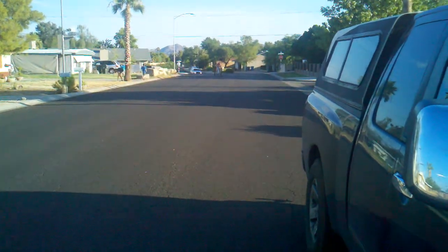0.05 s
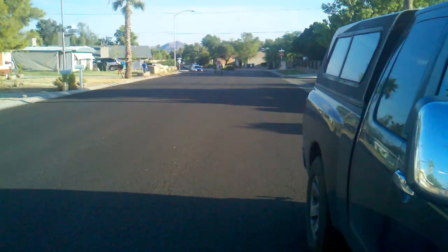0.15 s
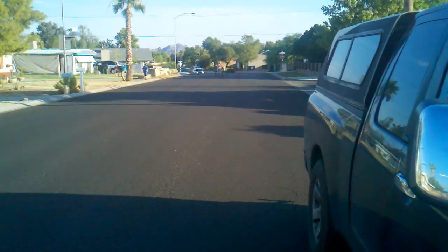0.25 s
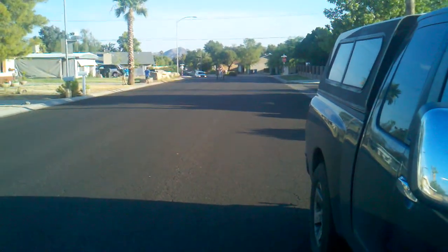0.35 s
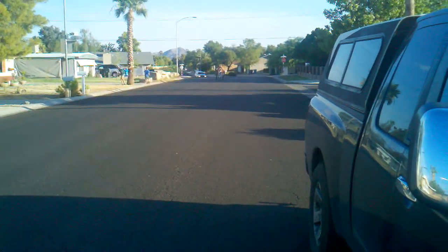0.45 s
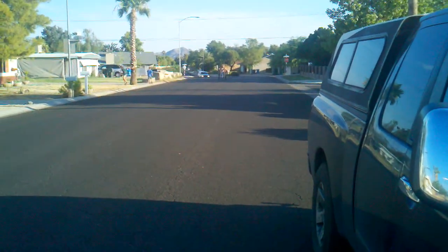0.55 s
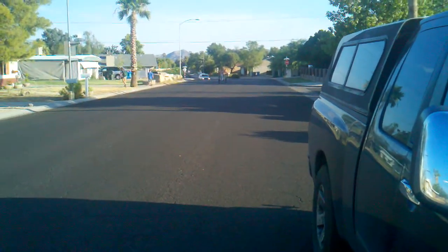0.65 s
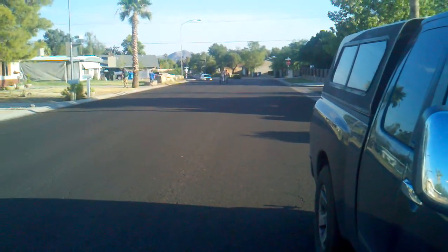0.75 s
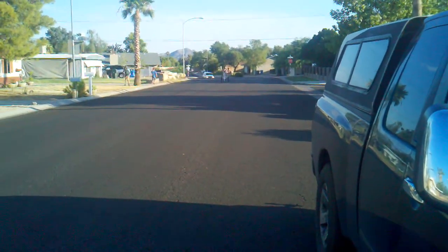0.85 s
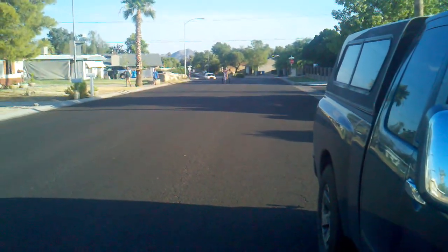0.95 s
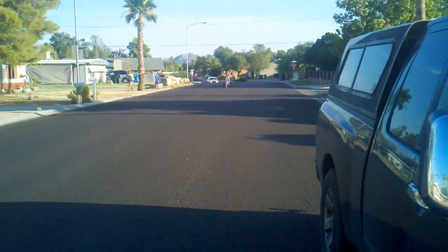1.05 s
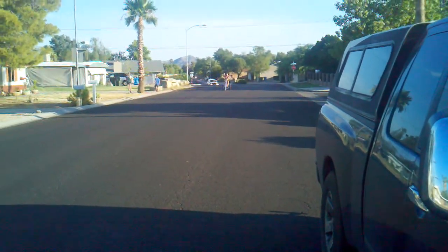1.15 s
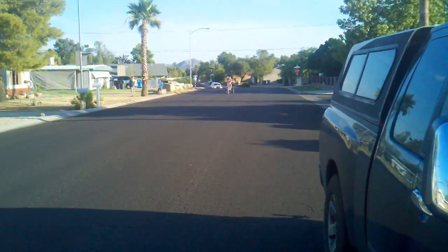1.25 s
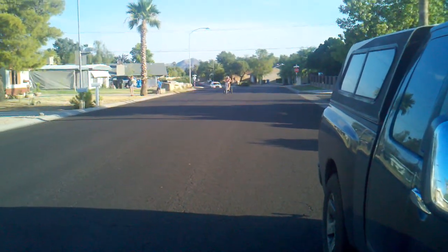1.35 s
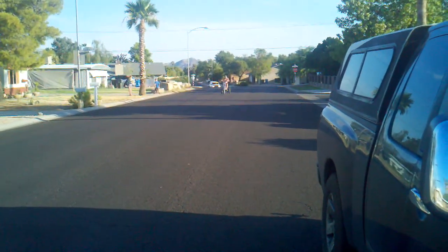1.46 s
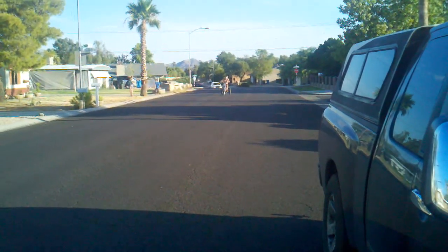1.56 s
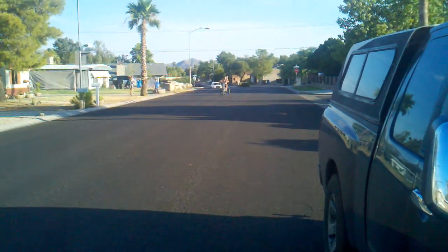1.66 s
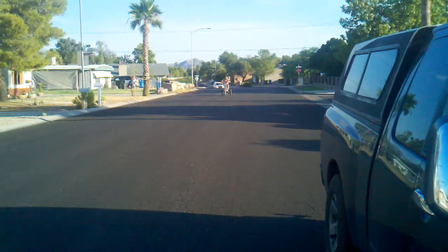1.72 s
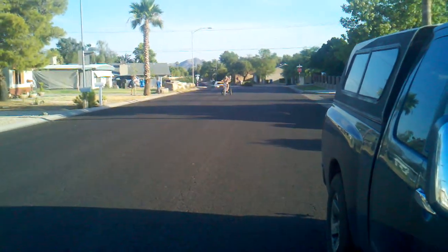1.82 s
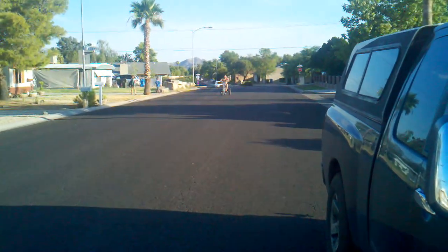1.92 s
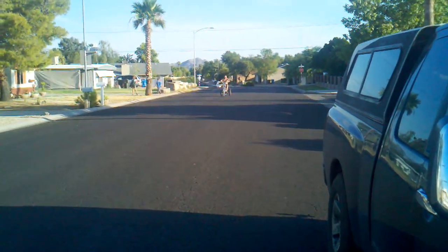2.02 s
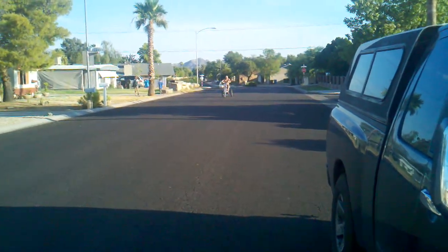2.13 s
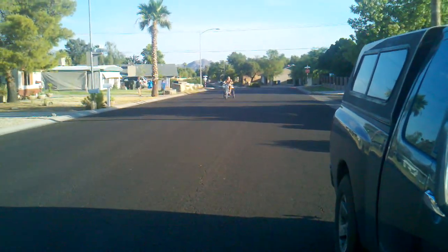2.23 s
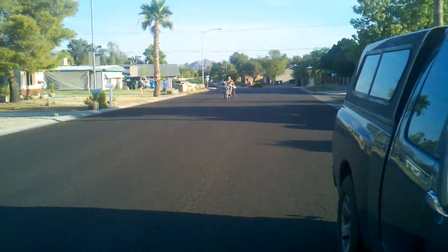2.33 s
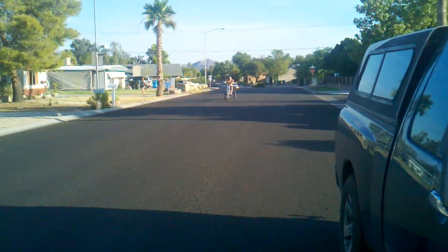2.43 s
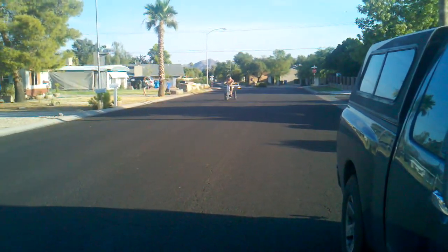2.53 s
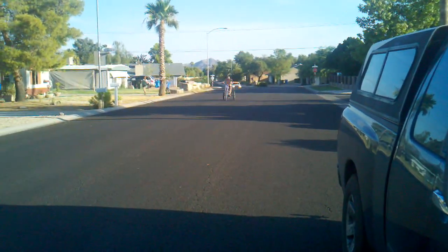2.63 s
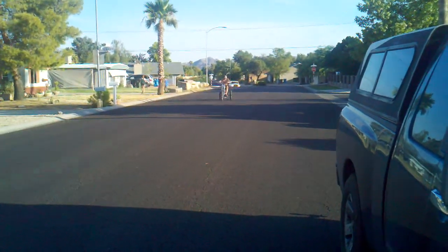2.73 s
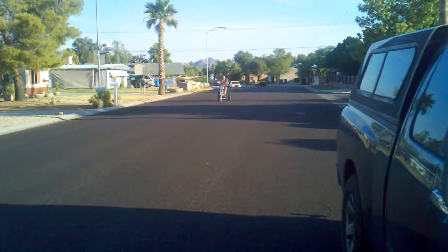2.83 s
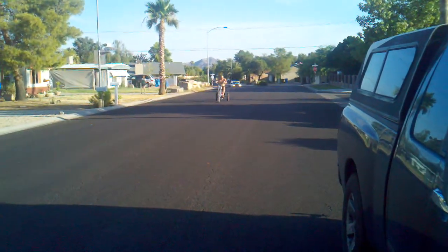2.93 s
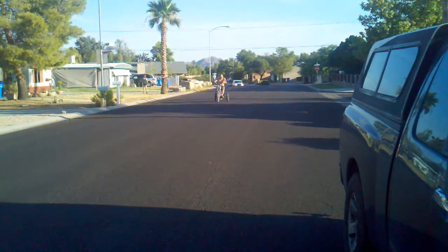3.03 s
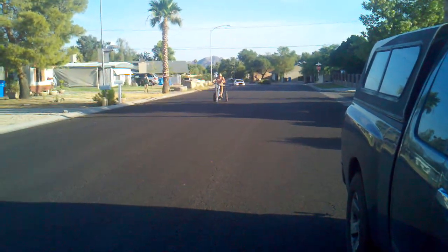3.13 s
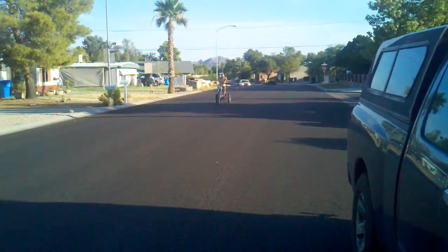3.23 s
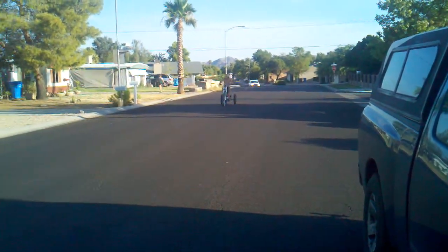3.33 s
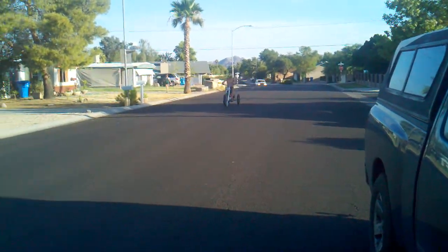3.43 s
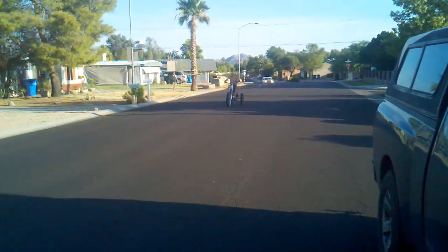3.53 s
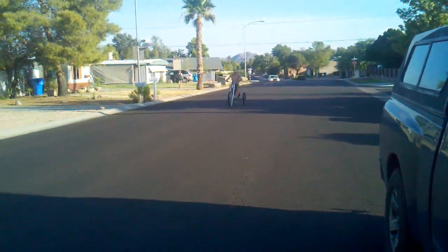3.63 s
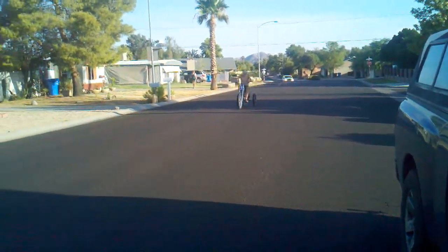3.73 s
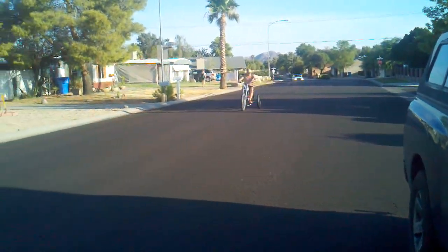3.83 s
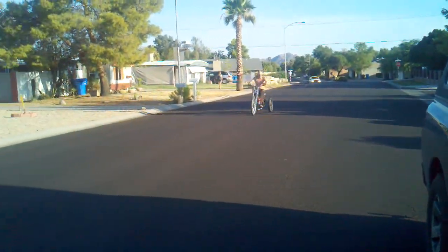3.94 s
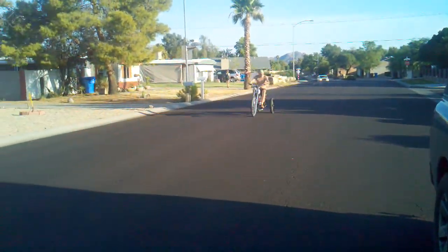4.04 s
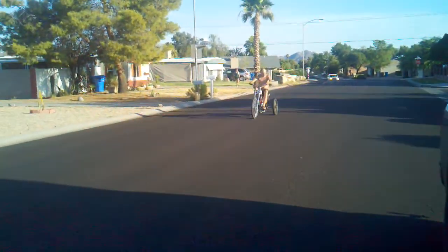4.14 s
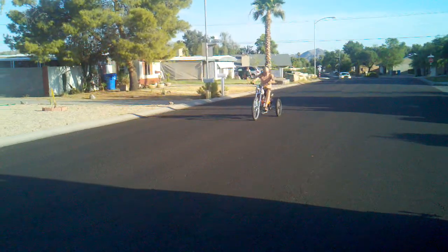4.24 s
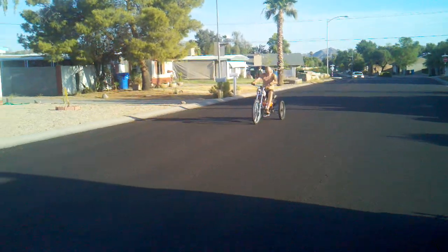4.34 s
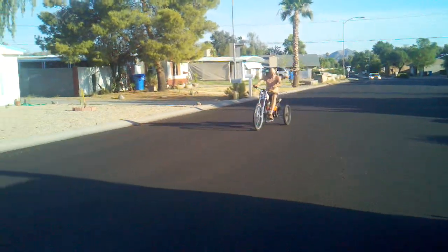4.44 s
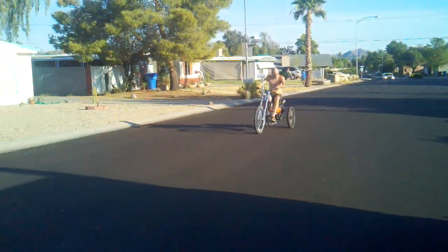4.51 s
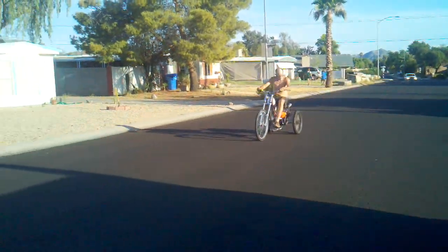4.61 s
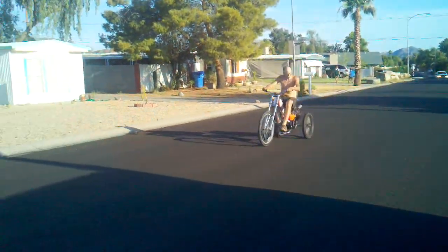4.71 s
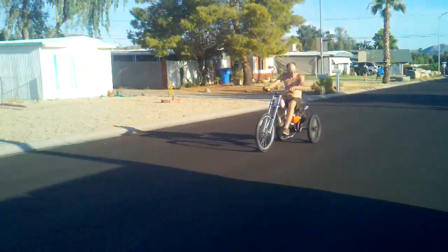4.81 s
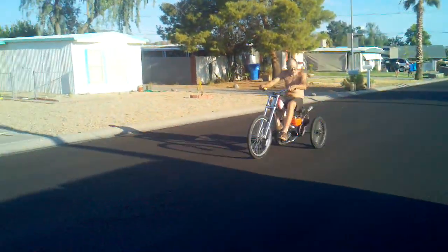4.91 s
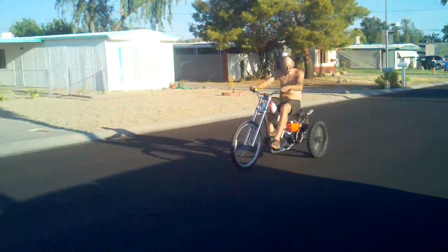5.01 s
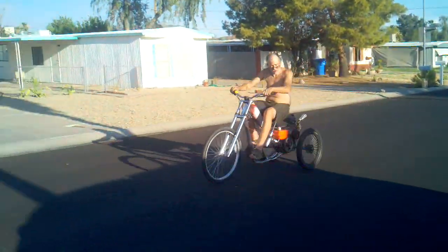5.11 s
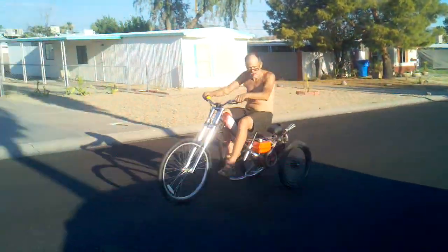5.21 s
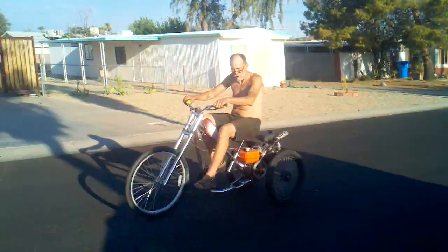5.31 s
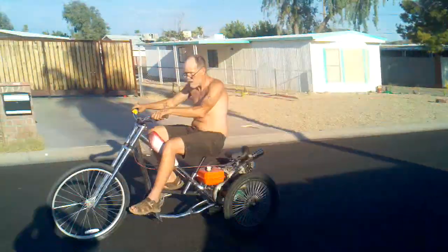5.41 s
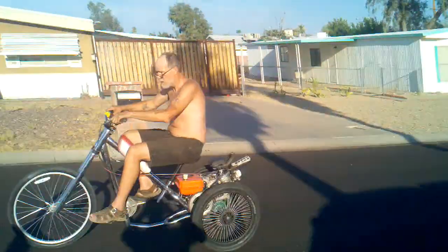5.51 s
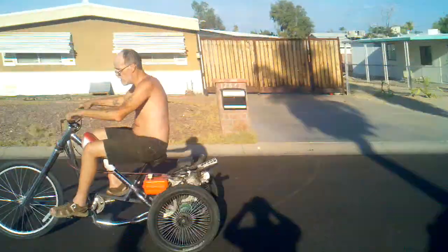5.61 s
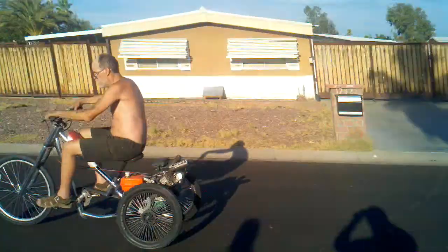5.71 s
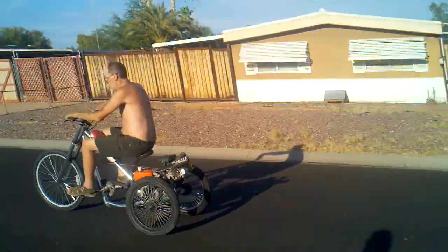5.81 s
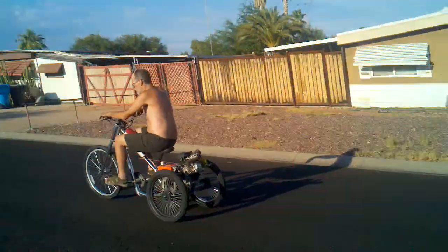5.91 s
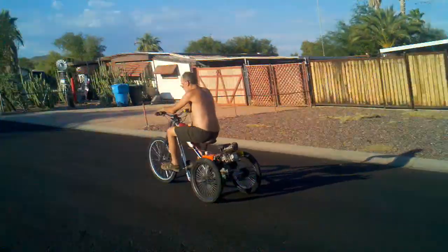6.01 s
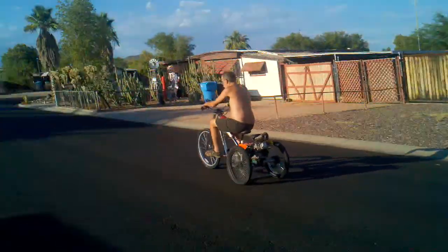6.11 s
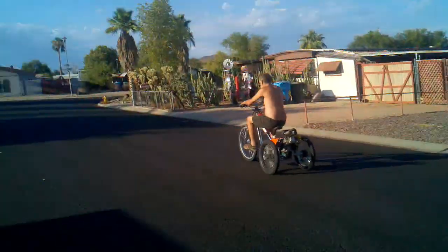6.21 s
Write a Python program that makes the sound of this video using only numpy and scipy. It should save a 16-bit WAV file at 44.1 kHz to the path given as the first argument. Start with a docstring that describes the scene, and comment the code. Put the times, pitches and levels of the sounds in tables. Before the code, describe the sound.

Outdoors on a quiet residential street, a small single-cylinder four-stroke tricycle is first heard far off: low, hollow, uneven putts, about twenty per second, with odd missed beats near 0.3, 0.8 and 1.5 s. Behind it lie a faint low traffic murmur and tiny high bird chirps at 0.6, 1.1 and 1.7 s. Soft wind buffets come from about 1.3 s, strongest near 2.8 s. The firing quickens to around thirty-five per second and swells steadily, gaining metallic casing rattle, valve clatter and chain hiss, with short street echoes. From 5 s it rushes close, hollow tone sinking, and passes about 5.6 s with a loud, rough bark. The throttle shuts at 5.7 s; pitch falls and dry pops crack, ending in a heavy thump near 6.1 s. The engine picks up again, moving away until the 6.3 s end. Wide stereo, with loud beats compressed.

```python
"""Motor tricycle passing on a street

A tricycle with a small single-cylinder four-stroke engine speeds up along a residential street and passes close by.
Exhaust pulses ring muffler colours and echo; shaped noise makes the rattle of casing, fins, valves and chain.
The throttle closes with pops and a backfire; gusts, a murmur of traffic and a few bird chirps lie around it.
A two-port microphone picks it up: stereo widening notches the treble and gain control restrains the loud pass.
"""
import sys
import numpy as np
from scipy import signal
from scipy.fft import rfft, irfft, next_fast_len
from scipy.io import wavfile
from scipy.ndimage import uniform_filter1d, map_coordinates

SR = 44100
rng = np.random.default_rng(int(sys.argv[2]) if len(sys.argv) > 2 else 0)


def file_out(sig):
    """Save sig as 16-bit WAV at sys.argv[1]."""
    # one column per channel
    cols = np.atleast_2d(sig).T
    # limit, then scale
    lim = np.clip(cols, -1, 1)
    pcm = np.round(lim * 32767).astype(np.int16)
    wavfile.write(sys.argv[1], SR, pcm)


N = 276066
T = np.arange(N) / SR
NEAREST_M = 3.703
SOUND_M_PER_S = 343

# engine speed before falters: (time [s], firing rate [1/s])
FIRING_RATE = [(0.0, 20.484), (0.25, 20.435), (0.5, 22.35), (0.752, 22.364), (0.983, 23.704),
               (1.416, 24.793), (1.854, 26.577), (3.332, 30.994), (4.026, 32.196), (4.243, 33.058),
               (4.504, 33.15), (4.73, 34.567), (5.411, 35.591), (5.762, 33.674), (5.817, 31.283),
               (6.26, 34.48)]
# engine effort: rises until about 3 s, eases through the pass, drops as the throttle shuts,
# partly recovers: (time [s], level [dB])
THROTTLE_EFFORT = [(0, -11.5), (1.2, -9), (2.45, -3.5), (3.15, 1), (5.64, -4.5), (5.8, -8), (6.0, -5),
                   (6.26, -6)]
# throttle snaps shut: (start [s], end [s])
THROTTLE_SHUT_S = (5.65, 5.7)
# engine radiation: (angle off the nose [deg], boom level [dB], bark level [dB], casing level [dB])
RADIATION = [(4.97, -14, -17, -14), (8.7, -15, -17, -15), (13.3, -15, -22, -14), (22.5, -13, -19, -18),
             (37, -18, -26, -20.5), (57, -20.5, -13.5, -17.5), (88, -11.5, -8.5, -13),
             (126.4, -17, -14.5, -16.5), (141, -14, -37, -15.5)]


def amp(db):
    """Decibels to gain."""
    return 10 ** (np.asarray(db) / 20)


def unit(x):
    """Scale to rms 1."""
    return x / np.sqrt(np.mean(x ** 2) + 1e-20)


def along(points, hz):
    """(frequency [Hz], value) points read on a log axis."""
    f, v = np.transpose(points)
    return np.interp(np.log(hz + 1), np.log(f + 1), v)


def curves(rows):
    """One value per sample for each column after the time."""
    s, *cols = np.transpose(rows)
    return [np.interp(T, s, c) for c in cols]


def by_angle(rows):
    """One value per sample for each column after the angle."""
    degrees, *cols = np.transpose(rows)
    return [np.interp(ride()[1], degrees, c) for c in cols]


def bump(s, half_s):
    """A smooth swell of height 1 around time s."""
    return np.exp(-np.minimum(((T - s) / half_s) ** 2 / 2, 20))


def wobble(knots_per_s):
    """A smooth random curve."""
    knots = rng.standard_normal(int(N * knots_per_s / SR) + 4)
    return map_coordinates(knots, [T * knots_per_s])


def filtered(x, response):
    """x times a response of frequency."""
    m = next_fast_len(N + SR // 2)
    return irfft(rfft(x, m) * response(np.fft.rfftfreq(m, 1 / SR)), m)[..., :N]


def noise(spectrum):
    """Two unrelated coloured noises, jointly of rms 1."""
    return unit(filtered(rng.standard_normal((2, N)), lambda hz: amp(along(spectrum, hz))))


def ring(spectrum, size=4096):
    """Causal (minimum-phase) impulse response of energy 1 with the given colour."""
    cepstrum = irfft(np.log(amp(along(spectrum, np.fft.rfftfreq(size, 1 / SR)))))
    cepstrum[1:size // 2] *= 2
    cepstrum[size // 2 + 1:] = 0
    response = irfft(np.exp(rfft(cepstrum)))
    return response / np.linalg.norm(response)


def moving_band(x, centre_hz, width_hz):
    """The part of x in a resonance whose centre moves: shift to 0 Hz, low-pass, shift back."""
    turn = np.exp(2j * np.pi * np.cumsum(centre_hz) / SR)
    keep = np.exp(-np.pi * abs(width_hz) / SR)
    return 2 * (signal.lfilter([1 - keep], [1, -keep], x / turn) * turn).real


def ports(mid, side):
    """Left and right from their common part and their difference."""
    return np.array([mid + side, mid - side])


def ride(pass_s=5.584, speed_m_per_s=7.08):
    """Straight path: distance to the trike [m] and the angle off its nose at which it is heard [deg]."""
    to_go_m = speed_m_per_s * (pass_s - T)
    return np.hypot(NEAREST_M, to_go_m), np.degrees(np.arctan2(NEAREST_M, to_go_m))


def drive_db():
    """Level shared by the engine's parts: effort, and spreading with distance."""
    return curves(THROTTLE_EFFORT)[0] - 20 * np.log10(ride()[0] / NEAREST_M)


def sideways(ahead_db, side_gain_db):
    """Level of a part that radiates mainly to the side of the trike."""
    return drive_db() + ahead_db + side_gain_db * np.sin(np.radians(ride()[1])) ** 2


def screened(near_db, loss_db, behind_db):
    """Level of a part screened by rider and frame; loss_db is extra, per doubling of distance."""
    distance_m, angle_deg = ride()
    behind = np.maximum(-np.cos(np.radians(angle_deg)), 0)
    return drive_db() + near_db - loss_db * np.log2(distance_m / NEAREST_M) + behind_db * behind


def cycles(start=.31, falter_s=.05):
    """Engine cycles run so far; the exhaust valve opens at each whole number."""
    # engine falters and catches up: (time [s], lag of the firings [s])
    falters = [(.07, .002), (.31, .003), (.77, .0025), (1.27, .0022), (1.45, -.0015), (1.9, .001),
               (2.27, .0022), (2.6, .0018), (3.0, .0013), (3.46, .0018), (3.77, .0014), (4.0, .001),
               (5.1, .0012), (5.65, -.0018), (5.8, .002), (6.13, -.003)]
    rate, = curves(FIRING_RATE)
    lag_s = sum(peak_s * bump(s, falter_s) for s, peak_s in falters)
    return np.cumsum(rate) / SR - start - rate * lag_s


def beats(scatter_db, jitter_s, ragged_s):
    """One push per firing, uneven in strength and time; jitter becomes ragged_s with the throttle shut."""
    # firings that fail or burn unevenly: (time [s], level change [dB])
    misfires = [(.016, 3), (.114, -1.5), (.162, 1.5), (.261, -14), (.718, 1), (.764, -12), (.808, 1),
                (.851, -3), (1.02, 2), (1.472, -11), (1.51, 2.5), (1.55, -2), (1.63, -2), (1.9, -3.5),
                (2.01, -1), (2.083, 1.5), (2.193, 1.5), (2.23, 2), (2.34, 0), (2.62, 1.5), (2.722, -1),
                (2.825, -3), (3.027, 0.5), (3.19, -2), (3.254, 0.5), (5.683, -4), (5.715, -2), (5.744, 2),
                (5.772, 1.5), (5.895, 1), (5.927, -1), (6.08, -18), (6.138, -1), (6.17, 3.5), (6.199, -5)]
    # second thumps in the pipe: (time [s], level re a firing [dB])
    late_burns = [(5.995, -13), (6.025, -4), (6.0554, -1)]
    turn = cycles()
    times = np.interp(np.arange(int(turn[-1]) + 1), turn, T)
    chance = rng.standard_normal((len(times), 2))
    level_db = scatter_db * chance[:, 0]
    for s, db in misfires:
        level_db[np.argmin(abs(times - s))] += db
    times = times + np.interp(times, THROTTLE_SHUT_S, [jitter_s, ragged_s]) * chance[:, 1]
    times, level_db = np.vstack([np.column_stack([times, level_db]), late_burns]).T
    at = np.clip(times * SR, 0, N - 1).astype(int)
    return np.bincount(at, amp(level_db), N) / np.sqrt(curves(FIRING_RATE)[0])


def street(x, speed_m_per_s, reach_s, fade_s, count=36):
    """Echoes from walls, kerbs and cars; each path grows or shrinks at its own rate as the trike rolls."""
    echo = np.zeros(N)
    for place, bearing, phase in rng.random((count, 3)):
        drift = speed_m_per_s / SOUND_M_PER_S * np.cos(2 * np.pi * bearing)
        slide = place + drift / reach_s * T
        path = slide - np.floor(slide)
        delay_s = reach_s * path
        # silent at both ends of the path range, so that wrapping is inaudible
        gain = np.minimum(delay_s / .01, 1) * (1 - path) * np.exp(-delay_s / fade_s)
        source = np.maximum(np.arange(N) - (delay_s * SR).astype(int), 0)
        echo += np.sign(phase - .5) * gain * x[source]
    # short-term echo power follows the power received
    power = lambda v: abs(uniform_filter1d(v ** 2, size=SR // 5)) + 1e-14
    return echo * np.sqrt(power(x) / power(echo))


def road_bounce(x, share=0.83, width_hz=140, top_hz=1520, mic_height_m=1.88, engine_height_m=0.886):
    """The bounce off the road reinforces a band that sinks as the trike nears and rises as it leaves."""
    detour_m = 2 * mic_height_m * engine_height_m / ride()[0]
    hz = SOUND_M_PER_S / detour_m
    fade = 1 / (1 + (hz / top_hz) ** 12)
    return share * fade * moving_band(x, hz, width_hz)


def exhaust(split_hz=540, puff=.17, puff_s=0.0054, side_db=2, shut_bark_db=-4,
            hollow_width_hz=55, growl_width_hz=32):
    """Each push rings the muffler and blows a puff of gas; the colour turns as the trike passes."""
    # exhaust colours by view: (frequency [Hz], relative level [dB])
    ahead_colour = [(30, -50), (70, -50), (105, -15.5), (165, -1.5), (200, 2), (255, -9.5), (322, 3.5),
                    (420, -3.5), (515, -12.5), (590, -1), (700, 1.5), (930, 2.5), (1030, -4.5),
                    (1120, -7.5), (1290, -21), (1430, -11), (1600, -17), (2300, -58.5)]
    quarter_colour = [(30, -62), (70, -36), (105, -14), (172, -2), (236, 5.5), (293, -3.5), (342, 6.5),
                      (385, -1), (420, -1.5), (460, -10.5), (530, -13.5), (720, -10), (880, -14),
                      (1120, -8), (1250, -10), (1450, -27), (2300, -37)]
    beside_colour = [(30, -71), (60, -50), (74, -24), (110, 0.5), (140, 3), (172, 6), (245, 9), (305, 0),
                     (350, 3), (410, -12.5), (470, -5.5), (560, -12.5), (700, -3.5), (950, 1), (1200, -1),
                     (1500, -19.5), (2200, -21.5), (4000, -45)]
    behind_colour = [(30, -50), (70, -36), (120, -14), (190, 1.5), (255, -0.5), (325, 2), (420, -13),
                     (580, -13), (750, -22), (1100, 7), (1500, -12), (4000, -65)]
    # colour of the port difference: (frequency [Hz], level before side_db [dB])
    spread = [(60, -21), (170, -19), (250, -16.5), (350, -17.5), (480, 4), (620, -6), (800, -71),
              (1500, -49), (2200, 10)]
    # street echo re direct sound: (angle off the nose [deg], boom level [dB], bark level [dB])
    wet = [(5.4, -7, -7), (6, -4.5, -6), (9, -4.5, -7), (14, -5, -7), (17, -6, -4.5), (22, -9, -.5),
           (38, -12, -.5), (60, -13, -5.5), (120, -10, -3)]
    # pipe resonances and gaps: (multiple of firing rate, width [Hz], added share before effort)
    pipe = [(5.05, 18, .12), (7, 16, .6), (8.9, 18, -.45), (10.1, 24, .35), (11, 16, .25), (12, 16, -.4),
            (13, 20, .4)]
    # hollow resonance, sinking as the trike draws level: (time [s], centre [Hz], added share)
    hollow = [(4.92, 530, 0), (5.05, 485, 4), (5.17, 468, 6.2), (5.29, 435, 5), (5.36, 375, 1.5),
              (5.44, 355, 1), (5.5, 345, 0)]
    # wavering growl with the throttle shut: (time [s], centre [Hz], added share)
    growl = [(5.7, 190, 0), (5.78, 215, .8), (5.87, 218, .8), (5.895, 295, .7), (5.93, 268, 2.4),
             (5.97, 240, 1), (5.995, 332, 1.3), (6.04, 328, 1), (6.09, 300, .8), (6.135, 305, .3),
             (6.17, 335, 1.1), (6.205, 330, .3), (6.245, 368, 2)]

    push = beats(scatter_db=.8, jitter_s=.00005, ragged_s=.0003)
    keep = np.exp(-1 / (puff_s * SR))
    gas = signal.lfilter([1], [1, -keep], push) * rng.standard_normal(N)

    angle_deg = ride()[1]
    near = np.interp(angle_deg, [13.5, 23], [0, 1])
    beside = np.interp(angle_deg, [36, 55], [0, 1])
    behind = np.interp(angle_deg, [105, 128], [0, 1])
    views = [(ahead_colour, 1 - near), (quarter_colour, near - beside),
             (beside_colour, beside - behind), (behind_colour, behind)]

    # low boom is clean and hums on between firings under power; turbulence roughens only the bark above
    shut = np.interp(T, THROTTLE_SHUT_S, [0, 1])
    effort = (1 - shut) * amp(curves(THROTTLE_EFFORT)[0])
    rate = curves(FIRING_RATE)[0]
    low = lambda hz: 1 / (1 + (hz / split_hz) ** 8)
    smooth = filtered(push, low)
    hum = sum(share * moving_band(smooth, k * rate, width_hz) for k, width_hz, share in pipe)
    smooth = smooth + effort * hum
    rough = filtered(unit(push) + puff * unit(gas), lambda hz: 1 - low(hz))

    boom, bark = np.zeros(N), np.zeros(N)
    for colour, share in views:
        boom += share * unit(signal.oaconvolve(smooth, ring(colour))[:N])
        bark += share * unit(signal.oaconvolve(rough, ring(colour))[:N])
    growl_hz, growl_share = curves(growl)
    boom = boom + growl_share * moving_band(boom, growl_hz, growl_width_hz)

    # divide by the wet share so that direct plus echo keeps the level
    boom_db, bark_db, _ = drive_db() + by_angle(RADIATION)
    boom_wet, bark_wet = amp(by_angle(wet))
    boom = boom * amp(boom_db) / np.sqrt(1 + boom_wet ** 2)
    bark = bark * amp(bark_db + shut_bark_db * shut) / np.sqrt(1 + bark_wet ** 2)
    scattered = boom_wet * boom + bark_wet * bark
    echoes = [street(scattered, speed_m_per_s=2.2, reach_s=.16, fade_s=.13) for _ in range(2)]

    mid = boom + bark + echoes[0]
    hollow_hz, hollow_share = curves(hollow)
    mid = mid + road_bounce(mid) + hollow_share * moving_band(mid, hollow_hz, hollow_width_hz)
    side = filtered(boom + bark + echoes[1], lambda hz: amp(side_db + along(spread, hz)))
    return ports(mid, side)


def rattle(spectrum, depth, lag, sharp, flutter_db, side_db, combustion=1):
    """Metal noise with knocks at combustion and exhaust opening, then a short wash; lag in cycles."""
    turn = cycles()
    swell = lambda at, narrow: np.exp(narrow * (np.cos(2 * np.pi * (turn - at)) - 1))
    knocks = swell(lag, sharp) + combustion * swell(lag - .18, sharp) + 0.29 * swell(lag + 0.23, 5.0)
    envelope = unit((1 + depth * knocks) * amp(flutter_db * wobble(160)))
    mid, side = noise(spectrum) * envelope
    return ports(mid, amp(side_db) * side)


def patchy(x, depth_db):
    """Loose links and brackets ring briefly, now at one pitch and now at another."""
    z = signal.stft(x, nperseg=512)[2]
    field = uniform_filter1d(rng.standard_normal(z.shape[1:]), size=4, axis=0)
    field = uniform_filter1d(field, size=7, axis=1)
    return signal.istft(z * unit(amp(depth_db * unit(field))), nperseg=512)[1][:, :N]


def machinery(slack_s=0.044, casing_slack=0.25, valves_slack=0.63, sizzle_slack=1.54):
    """Casing and fins ring and the valves clatter with the firings; the chain hisses over its sprockets."""
    # part colours: (frequency [Hz], relative level [dB])
    casing_colour = [(50, -17), (160, 3.5), (400, 10.5), (520, 2), (680, 9), (1000, 6), (1400, -0.5),
                     (1600, 3), (1800, 10), (1950, -4.5), (2150, -7.5), (2600, -10.5), (3500, -26)]
    fins_colour = [(1100, -80), (1500, -41), (1850, 6), (2050, -7.5), (2250, -6.5), (2500, -7), (3000, -80)]
    valves_colour = [(1300, -16), (2080, 1.5), (2500, -1.5), (3000, 6), (3400, 5), (4000, 3), (4700, -3),
                     (5400, 1), (7000, -92)]
    chain_colour = [(4000, -9.5), (5500, -2.5), (6400, -4.5), (7000, -0.5), (8300, 3), (9400, -1),
                    (10500, -3), (12000, -17), (14500, -47)]
    sizzle_colour = [(8000, -19), (10500, 2.5), (11700, -7), (13000, -2), (14200, -6.5)]
    # chain briefly slack: (time [s], chain level change [dB]); other parts take a multiple
    slacks = [(.31, -4), (.8, -6), (1.52, -2), (2.28, -2), (2.98, -3), (3.73, -4.5), (3.97, -3.5),
              (5.52, -3.5), (5.83, -3), (6.19, -1.5)]
    # chain pulled taut, hissing louder: (time [s], half length [s], level change [dB])
    tugs = [(3.13, 0.061, 1), (4.302, 0.11, 3), (5.444, 0.032, 3)]

    slack_db = sum(db * bump(s, slack_s) for s, db in slacks)
    tug_db = sum(db * bump(s, half_s) for s, half_s, db in tugs)
    casing_db = drive_db() + by_angle(RADIATION)[-1] + casing_slack * slack_db
    fins_db = sideways(ahead_db=-32, side_gain_db=12.0)
    valves_db = sideways(ahead_db=-25.5, side_gain_db=13.5) + valves_slack * slack_db
    chain_db = screened(near_db=-12.0, loss_db=6.0, behind_db=-8.0) + slack_db + tug_db
    sizzle_db = screened(near_db=-9.0, loss_db=11.5, behind_db=-6.5) + sizzle_slack * slack_db + tug_db

    casing = amp(casing_db) * rattle(casing_colour, depth=0.75, lag=0.11, sharp=44, flutter_db=2.0,
                                     side_db=-9.0, combustion=0.55)
    fins = amp(fins_db) * rattle(fins_colour, depth=4.3, lag=0.028, sharp=7.3, flutter_db=5,
                                 side_db=3.5, combustion=0.12)
    valves = amp(valves_db) * rattle(valves_colour, depth=0.71, lag=0.091, sharp=16, flutter_db=0.5,
                                     side_db=0.0, combustion=0.3)
    chain = amp(chain_db) * rattle(chain_colour, depth=0.017, lag=0.13, sharp=5.5, flutter_db=1.0,
                                   side_db=-1.0)
    sizzle = amp(sizzle_db) * rattle(sizzle_colour, depth=0.038, lag=.1, sharp=5, flutter_db=1.2,
                                     side_db=-1.5)
    chain_flutter = amp(0.3 * wobble(22))
    return casing + fins + patchy(valves + (chain + sizzle) * chain_flutter, depth_db=2)


def wind(breeze_db=-56, lumps_db=0.0, common_db=-19):
    """Gusts rise out of a faint breeze and push mostly on one port against the other."""
    # buffeting colour: (frequency [Hz], relative level [dB])
    buffet = [(20, -38), (50, -66), (85, -8), (120, -2), (170, -14), (260, -20), (500, -35), (1200, -90)]
    # gusts: (time [s], half length [s], level [dB])
    gusts = [(0.595, 0.045, -52), (1.353, 0.085, -39), (1.55, 0.24, -41), (1.987, 0.11, -39),
             (2.405, 0.1, -43.5), (2.803, 0.17, -29.5), (3.342, 0.2, -38.5)]
    strength = amp(breeze_db) + sum(amp(db) * bump(s, half_s) for s, half_s, db in gusts)
    mid, side = strength * unit(noise(buffet) * amp(lumps_db * wobble(6.65)))
    return ports(amp(common_db) * mid, side)


def neighbourhood(db=-61):
    """A faint, steady murmur and drone of distant traffic: low coloured noise."""
    return amp(db) * noise([(20, 4), (55, 28), (85, 29), (125, 35), (300, 12), (1000, -21),
                            (4000, -39), (14000, -40)])


def bird(length_s=0.012, fall=0.0095):
    """Short, faint chirps: swelling sines whose pitch falls by a share per length, with a wobble."""
    # chirps: (time [s], centre pitch [Hz], level [dB])
    chirps = [(.64, 6200, -60), (1.135, 5900, -55), (1.665, 5780, -47)]
    song = np.zeros(N)
    for s, hz, db in chirps:
        age = np.clip((T - s) / length_s, -6, 6)
        pitch_hz = hz * (1 - fall * age + 0.021 * wobble(280))
        song += amp(db) * np.exp(-age ** 2 / 2) * np.sin(2 * np.pi * np.cumsum(pitch_hz) / SR)
    return ports(song, .3 * song)


def backfire(spit=0.14, spit_s=0.0025):
    """Unburnt fuel pops in the muffler: a dry thump and a crack, with a bright spit of gas."""
    # colours: (frequency [Hz], relative level [dB])
    thump_colour = [(40, -43), (140, 3), (300, 4.5), (470, -5), (620, -19), (850, -6), (1150, -1),
                    (1550, -16), (1950, -11), (2400, -20), (3800, -22), (7000, -29), (9200, -21),
                    (14000, -34)]
    crack_colour = [(200, -38), (480, -8), (620, 6), (1050, -4), (1350, -10), (2000, -31), (4000, -28),
                    (9000, -43)]
    # pops: (time [s], thump level [dB], crack level [dB])
    backfires = [(5.5914, 2, -4), (5.768, 3, 9), (5.8625, 1, 3), (5.956, -10, -2), (6.0775, 18, -20)]
    bright = signal.butter(2, 1500, "highpass", fs=SR)
    pop = np.zeros(N)
    for s, thump_db, crack_db in backfires:
        age_s = np.maximum(T - s, 0)
        gas = spit * np.exp(-age_s / spit_s) * (age_s > 0) * rng.standard_normal(N)
        blast = signal.lfilter(*bright, gas)
        blast[round(s * SR)] -= 1
        body = amp(thump_db) * ring(thump_colour) + amp(crack_db) * ring(crack_colour)
        pop += signal.oaconvolve(blast, body)[:N]
    return ports(pop, 0.23 * pop)


def scene():
    """The trike, the breeze and the quiet street."""
    return exhaust() + machinery() + wind() + neighbourhood() + bird() + backfire()


def gain_control(x, threshold_db=-20, slope=0.87, sense_s=0.005, attack_s=0.0033, release_db_per_s=8):
    """Gain drops quickly on loud beats and comes back slowly."""
    def lagged(v, s):
        """One-pole smoothing with time constant s."""
        keep = np.exp(-1 / (s * SR))
        return signal.lfilter([1 - keep], [1, -keep], v)

    level_db = 10 * np.log10(lagged(np.mean(x ** 2, axis=0), sense_s) + 1e-12)
    over_db = slope * np.maximum(level_db - threshold_db, 0)
    # peak hold that decays at a constant rate
    cut_db = np.maximum.accumulate(over_db + release_db_per_s * T) - release_db_per_s * T
    return x * amp(-lagged(cut_db, attack_s))


def record(dry, crossfeed_hz=2650, skew_rad=0.99, low_cut_hz=62, top_hz=14250):
    """Widening subtracts a delayed copy of the other port: sum and difference get alternating notches."""
    angle = lambda hz: np.pi * hz / crossfeed_hz
    # quadrature leak keeps the notches from full depth
    leak = lambda hz: 1j * np.minimum(.03 * (hz / crossfeed_hz) ** 2, .5)
    mid_comb = lambda hz: np.sin(np.maximum(angle(hz), np.pi / 2)) + leak(hz)
    side_comb = lambda hz: np.exp(1j * skew_rad) * (np.cos(angle(hz)) + leak(hz))
    mid = filtered((dry[0] + dry[1]) / 2, mid_comb)
    side = filtered((dry[0] - dry[1]) / 2, side_comb)
    low_cut = lambda hz: hz ** 3 / np.sqrt(hz ** 6 + low_cut_hz ** 6)
    return filtered(gain_control(ports(mid, side)), lambda hz: low_cut(hz) * (hz < top_hz))


dry = scene()
out = record(dry)
file_out(out)
```